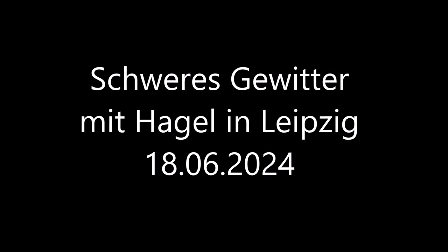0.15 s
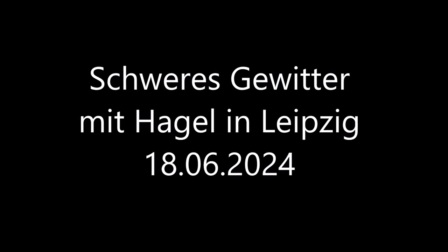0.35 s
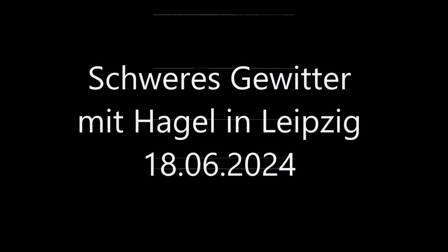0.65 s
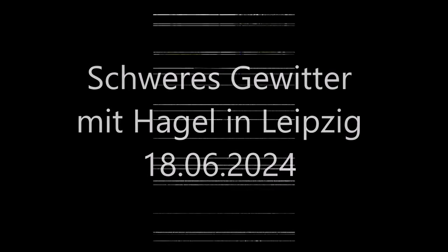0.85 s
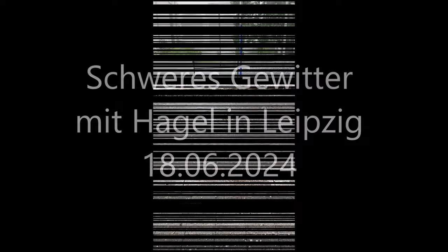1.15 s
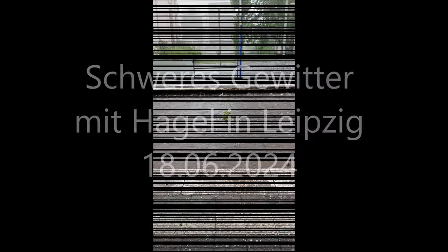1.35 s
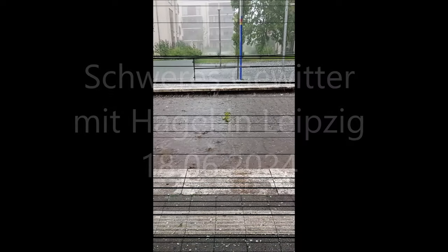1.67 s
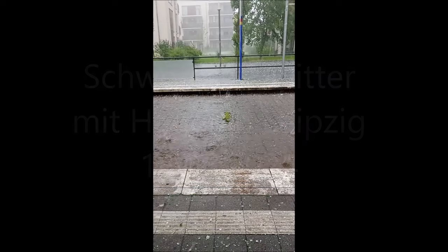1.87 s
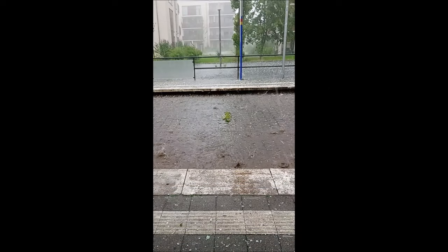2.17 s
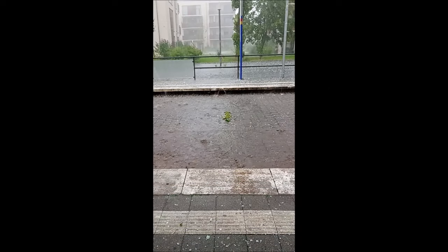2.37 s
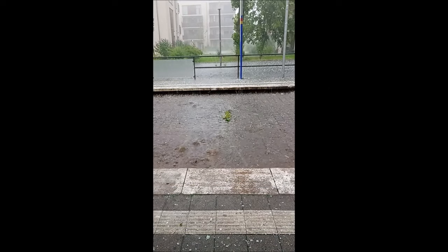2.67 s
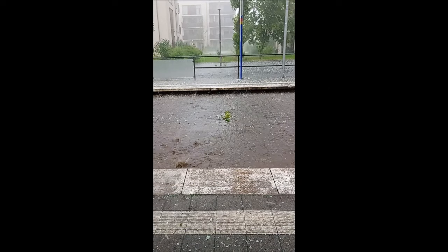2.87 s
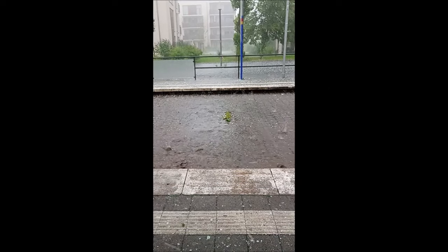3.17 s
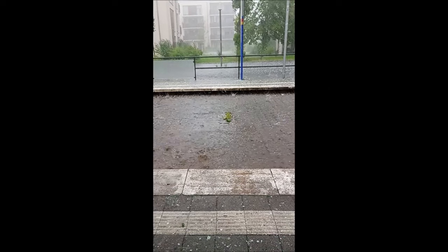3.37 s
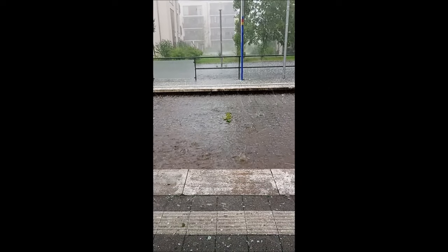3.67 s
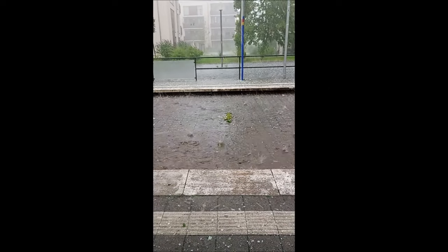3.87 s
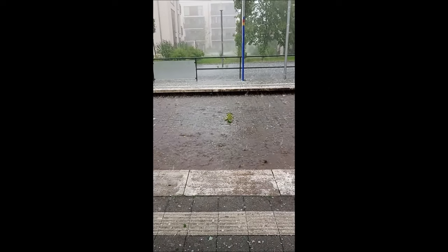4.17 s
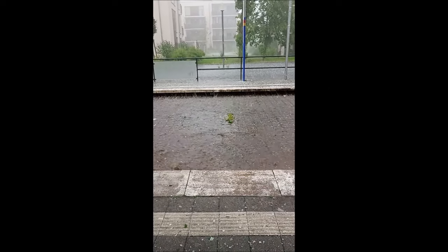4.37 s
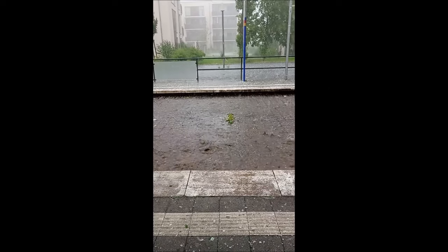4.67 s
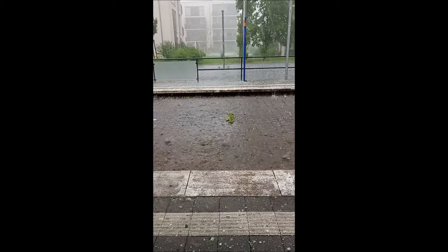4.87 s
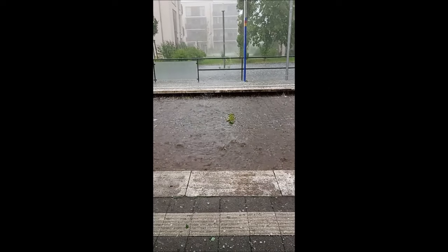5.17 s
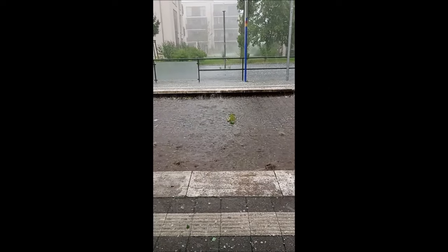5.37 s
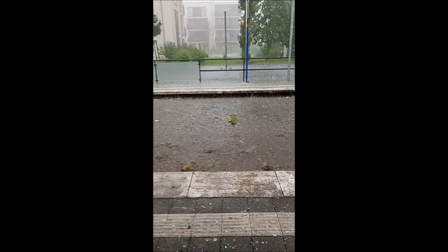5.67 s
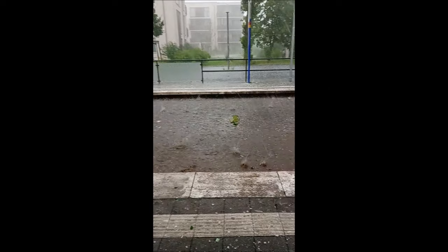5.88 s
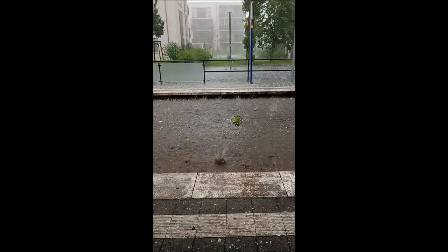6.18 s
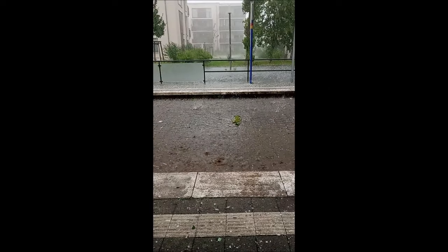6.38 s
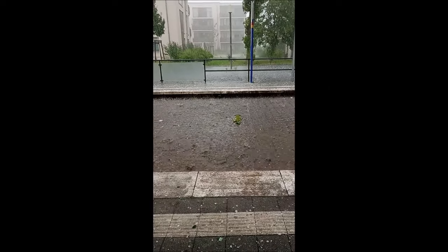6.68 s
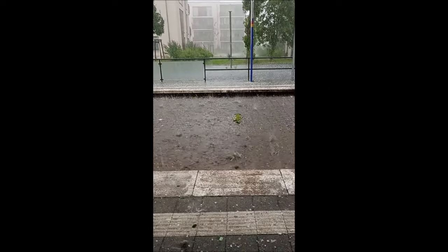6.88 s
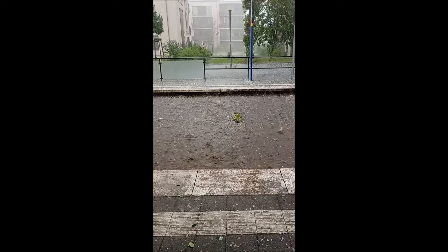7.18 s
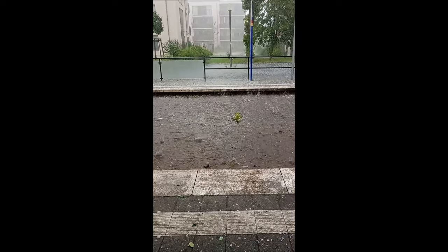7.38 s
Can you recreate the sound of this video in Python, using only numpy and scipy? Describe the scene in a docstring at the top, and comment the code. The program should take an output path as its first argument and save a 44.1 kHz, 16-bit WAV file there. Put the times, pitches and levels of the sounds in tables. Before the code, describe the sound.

Just over half a second of silence, then a storm cuts in at full strength. Dense rain hisses and patters on wet paving and drums on the shelter roof. Hailstones burst in crunchy cracks, knock a hollow panel and briefly ping a metal rail. Low thunder and wind rumble beneath. Sharp ticks on the slabs multiply in the second half. Heard close from under the shelter, with a tight short echo, in mono.

```python
"""Heavy rain and hail on paving, heard from under a shelter. After a short silence the sound starts abruptly.
From then on rain hisses, patters and drums (shaped noise and tiny damped sines), over rumbling thunder and wind.
At once big stones begin to shatter on the shelter (crackling noise), knock its roof panel and ping a rail (sines).
Soon small stones tick on the slabs (very short sines with grit), more often in the second half.
Two brief dips in level come before the middle; rain and rumble last to the end."""
import sys
import numpy as np
from scipy import signal
from scipy.fft import rfft, irfft, next_fast_len
from scipy.io import wavfile
from scipy.ndimage import uniform_filter1d, map_coordinates

SR = 44100
rng = np.random.default_rng(int(sys.argv[2]) if len(sys.argv) > 2 else 0)


def materialize(psi):
    """Save the field psi as 16-bit PCM at rate SR to the path in sys.argv[1].

    A 1-D psi becomes a single channel; in a 2-D psi each row is a channel.
    """
    bounded = np.clip(np.atleast_2d(psi).T, -1, 1)
    quanta = np.round(bounded * 32767).astype(np.int16)
    wavfile.write(sys.argv[1], SR, quanta)


N = 332073  # length in samples


def amp(db):
    """Turns decibels into a gain."""
    return 10 ** (np.asarray(db) / 20)


def unit(x):
    """Scales a sound to an rms strength of 1."""
    return x / np.sqrt(np.mean(x ** 2) + 1e-20)


def clock(seconds):
    """Time in seconds at each sample of a short sound."""
    return np.arange(int(seconds * SR)) / SR


def along(points, hz):
    """Reads a curve of (pitch, value) points, spaced evenly in log pitch."""
    pitch_hz, value = np.transpose(points)
    return np.interp(np.log(hz + 1), np.log(pitch_hz + 1), value)


def curves(rows):
    """Draws one smooth line over time for each column after the time."""
    start_s, *columns = np.transpose(rows)
    return [np.interp(np.arange(N) / SR, start_s, column) for column in columns]


def wobble(rate):
    """A smooth random curve with this many random points a second."""
    points = rng.standard_normal(int(N * rate / SR) + 4)
    return map_coordinates(points, [np.arange(N) * rate / SR])


def filtered(x, response):
    """Changes the strength of each pitch in x by a response."""
    m = next_fast_len(len(x) + 4096)
    return irfft(rfft(x, m) * response(np.fft.rfftfreq(m, 1 / SR)), m)[:len(x)]


def coloured(x, spectrum):
    """Gives noise the colour of a spectrum table, at rms 1."""
    return unit(filtered(x, lambda f: amp(along(spectrum, f))))


def band(hz, width):
    """A resonance that rings after it is struck; width is a share of its pitch."""
    return lambda f: 1j * f * width * hz / (hz * hz - f * f + 1j * f * width * hz)


def fade_in(t, seconds):
    """A rise toward full strength that is quick at first and then slows."""
    return 1 - np.exp(-t / seconds)


def add(track, s, sound):
    """Mixes a sound into a track at s seconds."""
    part = track[round(s * SR):][:len(sound)]
    part += sound[:len(part)]


def shower(spectrum, patchy_db):
    """Far drops merge into noise whose strength is patchy in time and pitch."""
    z = signal.stft(rng.standard_normal(N), nperseg=512)[2]
    field = uniform_filter1d(rng.standard_normal(z.shape), 6, 0)
    field = uniform_filter1d(field, 6, 1)
    far = signal.istft(z * amp(patchy_db * unit(field)), nperseg=512)[1][:N]
    return coloured(far, spectrum)


def drops(per_s, hz, spread, cycles, spread_db):
    """Near drops, each a short damped sine of its own pitch, life and size."""
    draw = rng.random((round(per_s * N / SR), 2))
    normal = rng.standard_normal((len(draw), 2))
    pitch = np.clip(hz * np.exp(spread * normal[:, :1]), 200, 6800)
    life = cycles * np.exp(.5 * normal[:, 1:]) / pitch
    size = amp(-spread_db * np.log(draw[:, 1:] + 0.0051))
    k = np.arange(256)
    envelope = (1 - np.exp(-k / 3)) * np.exp(-k / SR / life) * np.cos(np.pi * k / 512)
    grain = size * envelope * np.sin(2 * np.pi * pitch * k / SR)
    at = (draw[:, :1] * N).astype(int) + k
    return unit(np.bincount(at.ravel(), grain.ravel(), N)[:N])


# How hard it rains: start_s [s], level_db [dB]
RAIN_LEVEL = [(0.9, -30.5), (1.62, -30.5), (1.95, -26), (2.28, -31), (2.78, -24), (3.06, -31),
              (3.32, -30.5), (3.8, -27), (4.07, -29.5), (4.55, -26.5), (4.81, -29.5), (5.03, -28.5),
              (5.33, -25), (6.24, -29.5), (6.42, -28.5), (6.68, -25), (6.96, -30), (7.53, -33)]
# Colour of the hiss, also used for breaking ice and grit: pitch_hz [Hz], relative level_db [dB per Hz]
HISS_COLOUR = [(410, -11), (700, -4), (1000, -5.5), (1300, 0.5), (2660, 2.5), (4000, 1.5), (5450, -0.5),
               (6500, -4), (7200, -12.5), (8260, -24), (11700, -36), (19800, -120)]
# Colour of fine spray, also used for splinters: pitch_hz [Hz], relative level_db [dB per Hz]
SPRAY_COLOUR = [(5500, -41.5), (7000, 6), (8240, 2.5), (12000, -1.5), (15100, -5), (16000, -16)]
# Colour of the drumming roof: pitch_hz [Hz], relative level_db [dB per Hz]
DRUM_COLOUR = [(120, -69), (200, -5), (258, -3.5), (530, 0.5), (789, -2.5), (850, -4.5), (1200, -8.5),
               (1560, -61), (2640, -120)]
# The roof drums at DRUM_DB in usual rain; DRUM_GROWS is dB of drumming per dB of rain
USUAL_RAIN_DB, DRUM_DB, DRUM_GROWS = -27, -37.5, 1.22


def rain():
    """Hiss and patter on the slabs, fine spray and the drumming roof swell together in short gusts."""
    rain_db, = curves(RAIN_LEVEL)
    drum_db = DRUM_DB + DRUM_GROWS * (rain_db - USUAL_RAIN_DB)
    gust = .5 * wobble(12) + 0.66 * wobble(30)
    patter = drops(per_s=1100, hz=3700, spread=0.42, cycles=2.2, spread_db=3.8)
    stray_hail = drops(per_s=70, hz=5300, spread=0.34, cycles=0.69, spread_db=3.0)
    hiss = shower(HISS_COLOUR, patchy_db=2.0) + amp(-6.5) * patter + amp(-13) * stray_hail
    spray = shower(SPRAY_COLOUR, patchy_db=1.5)
    drum = shower(DRUM_COLOUR, patchy_db=4.0)
    drum = amp(drum_db + 1.05 * gust + 1.3 * wobble(6)) * drum
    return amp(rain_db + 0.92 * gust) * hiss + amp(rain_db - 18.5 + 1.8 * gust) * spray + drum


# Stones that shatter on the shelter: start_s [s], level_db [dB], colour_hz [Hz],
# treble_db [dB over the body], t60_s [s for the body to fall 60 dB]
SHATTERING_STONES = [(0.665, -28, 3320, -17, 0.33), (0.7067, -25, 3600, -19, 0.34),
                     (0.7641, -17, 2900, -12, 0.21), (0.8283, -23, 1620, -33, 0.13),
                     (1.207, -20.5, 5800, -2.5, 0.14), (1.942, -18.5, 3620, -19, 0.23),
                     (2.0198, -26.5, 3430, -13, 0.12), (2.139, -26, 5130, -29, 0.052),
                     (2.6441, -28, 4600, -20, 0.15), (2.7196, -20.5, 4500, -8, 0.16),
                     (2.7585, -23, 2750, -14, 0.24), (2.8136, -21, 1740, -30, 0.069),
                     (2.8965, -19, 5000, -31, .13), (3.056, -18, 5480, -12.5, 0.13),
                     (3.4375, -21, 5930, -8.5, 0.15), (3.7516, -28.5, 2000, -11, .13),
                     (3.8861, -20.5, 4200, -10.5, 0.25), (3.9802, -27, 5900, -11.5, 0.21),
                     (4.2114, -20, 4800, -16, 0.21), (4.37, -30, 5900, -14, 0.22),
                     (4.5772, -23.5, 2540, -16, 0.13), (4.7188, -28.5, 1800, -9, 0.29),
                     (4.7674, -20, 5930, -11.5, 0.11), (5.2808, -28.5, 4200, -24, 0.47),
                     (5.454, -26, 1930, -5, 0.15), (6.407, -31, 4130, -14, 0.35),
                     (6.4984, -25, 2140, -8, 0.057), (6.7087, -30, 4440, -18, .24),
                     (6.8324, -26.5, 1580, -23, 0.18), (7.2115, -27, 4250, -14.5, 0.35),
                     (7.2495, -20.5, 5860, -10, 0.14), (7.44, -29.5, 3910, -13, 0.31)]
CRUNCH_S = 0.0033  # the dying away begins this long after the hit


def smashes():
    """Ice shatters: a crackling burst of splinters, treble dying first, coloured by the shards' own pitches."""
    out, t = np.zeros(N), clock(1 / 3)
    for s, db, hz, treble_db, t60 in SHATTERING_STONES:
        noise = rng.standard_normal((4, len(t)))
        shards = np.clip(hz * np.exp(0.479 * rng.standard_normal(5)), 1000, 9000)

        def colour(f):
            return band(hz, .11)(f) + 0.75 * sum(band(p, .05)(f) for p in shards)

        ringing = unit(filtered(noise[1], lambda f: colour(f) * amp(along(HISS_COLOUR, f))))
        body = coloured(noise[0], HISS_COLOUR) + 1.22 * ringing
        treble = coloured(noise[2], SPRAY_COLOUR)
        crackle = amp(1.8 * unit(uniform_filter1d(noise[3], 60)))
        fall_db = 60 * np.clip(t - CRUNCH_S, 0, None) / t60
        burst = body * amp(-fall_db) + amp(treble_db) * treble * amp(-1.15 * fall_db)
        add(out, s, amp(db) * fade_in(t, 0.0017) * crackle * burst)
    return out


# Blows on the roof panel: start_s [s], level_db [dB], pitch_hz most excited [Hz]
PANEL_BLOWS = [(0.767, -29, 430), (0.82, -22, 307), (1.881, -19, 493), (1.954, -19.5, 580),
               (1.981, -26, 422), (2.009, -19, 380), (2.039, -24.5, 662), (2.066, -27.5, 640),
               (2.098, -17, 403), (2.139, -22.5, 402), (2.208, -28, 415), (2.282, -29, 426),
               (2.726, -28.5, 426), (2.904, -29.5, 433), (3.439, -27, 415), (3.753, -30.5, 417),
               (3.895, -19.5, 537), (4.213, -35, 600), (4.717, -24.5, 480), (4.745, -30.5, 427),
               (4.776, -28.5, 690), (5.457, -22.5, 430), (6.502, -18.5, 426), (6.529, -31, 664),
               (7.137, -27, 710), (7.169, -30.5, 470), (7.251, -23.5, 440), (7.442, -31, 500),
               (7.469, -36, 610)]
# Natural tones (modes) of the roof panel: pitch_hz [Hz], level_db [dB]
PANEL_MODES = [(290, 8), (405, 3.5), (445, 8), (488, 2.5), (640, 8.5)]
PANEL_T60_S = 0.15  # time to fall 60 dB


def knocks():
    """Each blow rings the panel modes nearest to the spot that it hits; the wet sheet detunes and rattles."""
    out, t = np.zeros(N), clock(1 / 2)
    for s, db, hz in PANEL_BLOWS:
        ring = 0
        for mode_hz, level in PANEL_MODES:
            # modes far from the struck pitch are weaker, by at most 14 dB
            mode_db = max(level - 40 * abs(np.log2(mode_hz / hz)), level - 14) + rng.normal(0, 1.5)
            ring = ring + amp(mode_db) * np.sin(2 * np.pi * mode_hz * rng.normal(1, 0.026) * t)
        rattle = unit(filtered(rng.standard_normal(len(t)), band(1.05 * hz, 0.54)))
        envelope = amp(db - 60 * t / PANEL_T60_S) * fade_in(t, 0.0036)
        add(out, s, envelope * (ring + 1.09 * rattle))
    return out


# Stones on the rail: start_s [s], level_db [dB], pitch_hz most excited [Hz]
RAIL_HITS = [(.763, -17, 7200), (1.21, -15, 5884), (1.211, -17, 7200), (2.071, -14, 6432),
             (6.722, -19, 1460), (.768, -20, 1680), (.832, -21, 1680), (2.905, -20, 2100),
             (4.211, -16, 2100), (4.37, -22, 7200), (5.279, -18, 4200), (6.502, -20, 2100),
             (6.832, -20, 1460)]
# Natural tones (modes) of the rail: pitch_hz [Hz], t60_s [s to fall 60 dB]
RAIL_MODES = [(1460, .07), (1680, .12), (2100, .045), (4200, .045), (5884, .15), (6432, .1), (7150, .045)]


def pings():
    """Struck wet metal rings in the mode nearest to the spot hit, its phase slightly unsteady."""
    out, t = np.zeros(N), clock(1 / 3)
    for s, db, spot_hz in RAIL_HITS:
        hz, t60 = min(RAIL_MODES, key=lambda mode: abs(mode[0] - spot_hz))
        drift = np.cumsum(rng.normal(0, 0.022, len(t)))
        envelope = amp(db - 60 * t / t60) * fade_in(t, 0.00021)
        add(out, s, envelope * np.sin(2 * np.pi * hz * t + drift))
    return out


# Small stones on the slabs: start_s [s], level_db [dB]
SMALL_STONES = [(1.304, -13), (2.2026, -13), (2.853, -11), (3.541, -13), (4.181, -25), (4.651, -20),
                (4.697, -14), (4.756, -9), (4.869, -18), (5.1238, -14), (5.4064, -7), (5.575, -17),
                (5.6986, -6), (5.7963, -7.5), (5.8322, -7.5), (6.0731, -13), (6.2233, -15), (6.264, -14),
                (6.8733, -8), (7.176, -2), (7.44, -14)]
TICK_HZ, TICK_SPREAD = 3800, .08  # middle pitch, and random spread in log pitch


def ticks():
    """A hard small stone on stone: a very short damped sine with grit and splinter noise."""
    out, t = np.zeros(N), clock(1 / 50)
    for s, db in SMALL_STONES:
        hz = TICK_HZ * np.exp(TICK_SPREAD * rng.standard_normal())
        grit = coloured(rng.standard_normal(len(t)), HISS_COLOUR)
        splinter = coloured(rng.standard_normal(len(t)), SPRAY_COLOUR)
        envelope = amp(db - 60 * t / 0.0056) * fade_in(t, 0.0002)
        add(out, s, envelope * (np.sin(2 * np.pi * hz * t) + 0.66 * grit + 0.062 * splinter))
    return out


# Colour of the broad rumble: pitch_hz [Hz], relative level_db [dB per Hz]
RUMBLE_COLOUR = [(15, -47), (25, -11), (81, 6), (214, -4.5), (296, 0.5), (400, -5.5), (520, -12),
                 (880, -120)]
# Hollow tones inside the rumble: pitch_hz [Hz], width [share of the pitch]
HOLLOW_TONES = [(75, 0.5), (105, 0.37), (150, 0.98), (220, 0.23), (300, 0.9)]
# Gusts that swell the rumble: start_s [s], length_s [s], level_db [dB], centre pitch_hz of their tone [Hz]
RUMBLE_GUSTS = [(0.68, 0.12, -34.5, 290), (1.23, 0.055, -38, 108), (1.496, 0.075, -36, 131),
                (1.712, 0.29, -39.5, 150), (2.147, 0.13, -32.5, 200), (2.58, 0.25, -44.5, 130),
                (2.93, 0.044, -40, 110), (3.446, 0.083, -33.5, 235), (3.564, 0.087, -35.5, 123),
                (3.76, 0.18, -28.5, 177), (3.963, 0.085, -30, 210), (4.072, 0.297, -31, 120),
                (4.385, 0.26, -30.5, 148), (5.22, .14, -37, 180), (5.766, 0.15, -29, 115),
                (6.016, 0.057, -33, 101), (6.157, 0.22, -48, 109), (6.57, .14, -24, 150),
                (6.736, 0.1, -23.5, 182), (6.853, .29, -33.5, 123), (7.21, 0.18, -42.5, 118)]
# Dull thumps in the rumble: start_s [s], level_db [dB], pitch_hz [Hz]
DULL_THUMPS = [(0.802, -17.5, 312), (5.229, -20, 213), (6.577, -15.5, 96.9), (6.588, -17, 229),
               (6.656, -10, 179), (6.683, -17.5, 314), (6.787, -6.5, 217), (6.986, -16, 95)]
CALM_DB, CALM_HZ = -45.5, 178  # the rumble between gusts
GUST_EDGE_S = 0.047  # rise and fall of a gust
TONE_SAGS_PER_S = 1.7  # a gust's tone sinks as it passes, in log pitch


def rumble():
    """Low rolling that swells in gusts, each sounding its own hollows, with dull thumps of a few cycles."""
    time = np.arange(N) / SR
    power = np.full(N, amp(2 * CALM_DB))
    pitch = power * np.log(CALM_HZ)  # log pitch weighted by power
    for s, length, db, hz in RUMBLE_GUSTS:
        edge = np.minimum(time - s, s + length - time) / GUST_EDGE_S + .5
        swell = amp(2 * db) * np.clip(edge, 0, 1) ** 2
        power = power + swell
        pitch = pitch + swell * (np.log(hz) - TONE_SAGS_PER_S * (time - s - length / 2))
    centre_hz = np.exp(pitch / power + 0.21 * wobble(12))

    noise = rng.standard_normal(N)
    roll = 0.97 * coloured(noise, RUMBLE_COLOUR)
    for hz, width in HOLLOW_TONES:
        nearness = np.exp(-(np.log(hz / centre_hz) / 0.3) ** 2)
        roll = roll + nearness * unit(filtered(noise, lambda f: band(hz, width)(f) ** 2))
    # even out the strength over about 60 ms
    roll = roll / np.sqrt(np.abs(uniform_filter1d(roll ** 2, size=2600)) + 0.15)
    out = np.sqrt(power) * amp(2.46 * wobble(16)) * unit(roll)

    t = clock(1 / 8)
    for s, db, hz in DULL_THUMPS:
        envelope = amp(db - 60 * t / 0.084) * fade_in(t, 0.0016)
        add(out, s, envelope * np.sin(2 * np.pi * hz * t))
    return out


def shelter(x):
    """Roof, ground and glass walls return a dense short echo."""
    t = clock(1 / 5)
    tail = rng.standard_normal(len(t)) * amp(-60 * t / 0.11) * (t > .004)
    echo = signal.fftconvolve(x, tail / np.linalg.norm(tail))[:N]
    return x + amp(-8) * echo


# Brief changes of level, one slight rise and two dips: start_s [s], end_s [s], change_db [dB]
LEVEL_CHANGES = [(2.09, 2.102, 1), (2.875, 2.895, -6), (3.036, 3.062, -6)]
START_S = .654  # silence until here


def scene():
    """Mixes all the sources, silent before the start; the ticks keep their level through the dips."""
    t = np.arange(N) / SR
    on = np.clip((t - START_S) / 0.011, 0, 1)
    change_db = np.zeros(N)
    for start, end, db in LEVEL_CHANGES:
        change_db += db * ((t > start) & (t < end))
    change_db = uniform_filter1d(change_db, size=90)
    struck = shelter(pings() + knocks()) + smashes()
    return (on * (amp(change_db) * (rain() + rumble() + struck) + ticks()))[None]


BASS_HZ, TOP_HZ = 38, 15900  # the microphone's bass cut, and the upper band limit


def record(dry):
    """Peaks round off softly; deep bass is cut; the sound stops steeply above the band limit."""
    soft = dry[0] / (1 + np.abs(dry[0] / .7) ** 4) ** .25

    def response(hz):
        bass_cut = hz ** 4 / (hz ** 4 + BASS_HZ ** 4)
        return bass_cut / (1 + (hz / TOP_HZ) ** 400)

    return filtered(soft, response)[None]


dry = scene()
out = record(dry)
materialize(out)
```